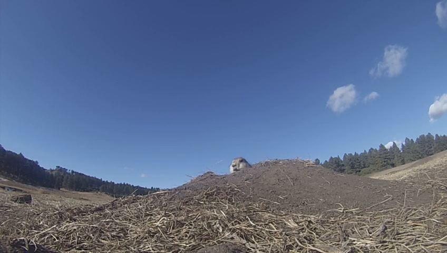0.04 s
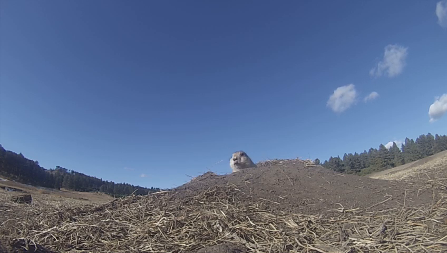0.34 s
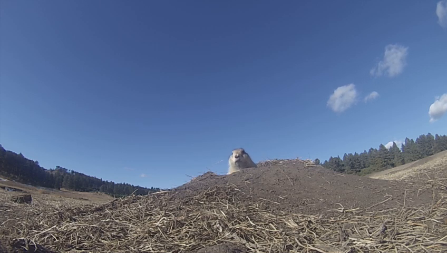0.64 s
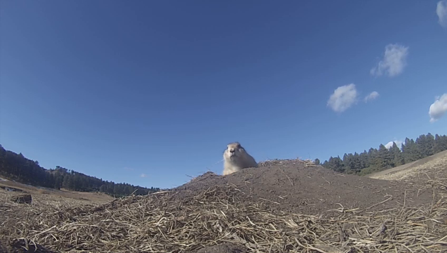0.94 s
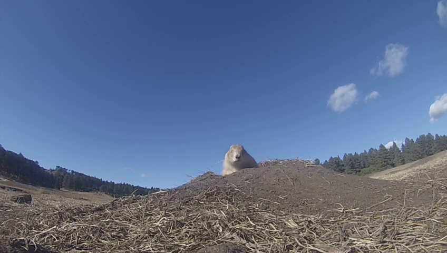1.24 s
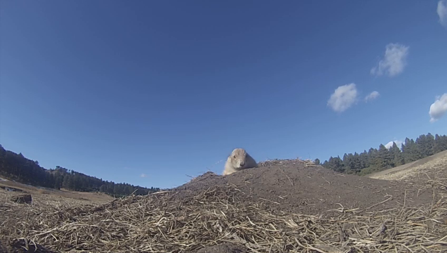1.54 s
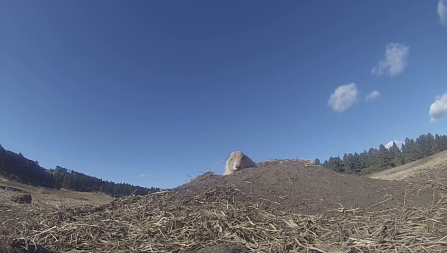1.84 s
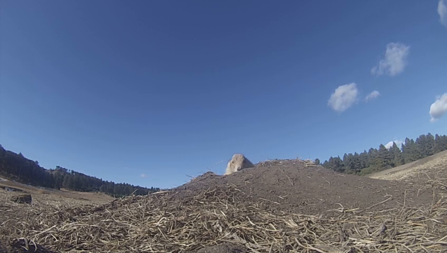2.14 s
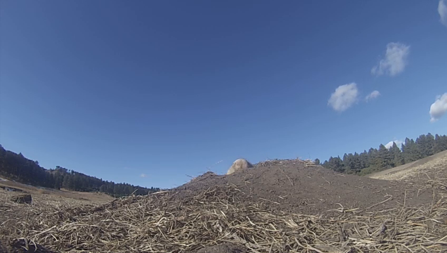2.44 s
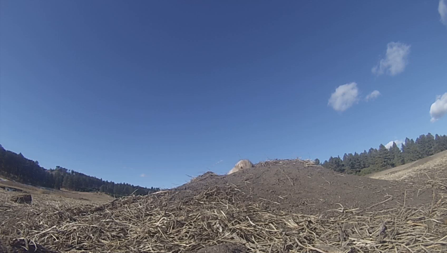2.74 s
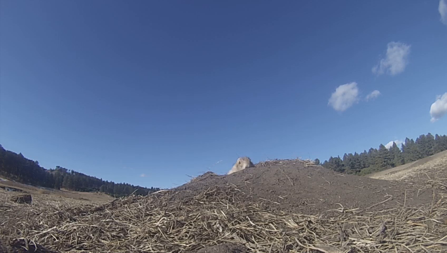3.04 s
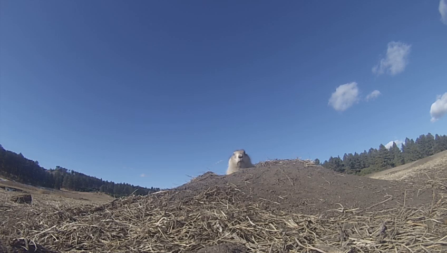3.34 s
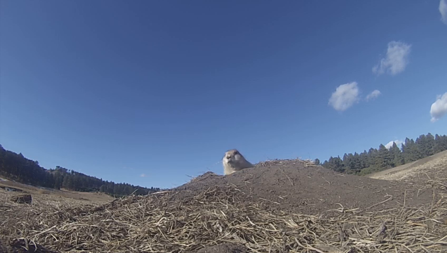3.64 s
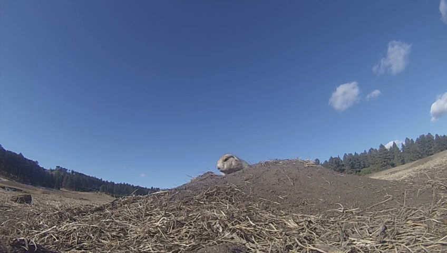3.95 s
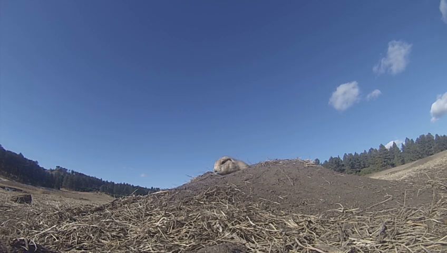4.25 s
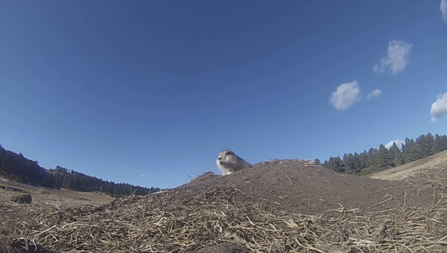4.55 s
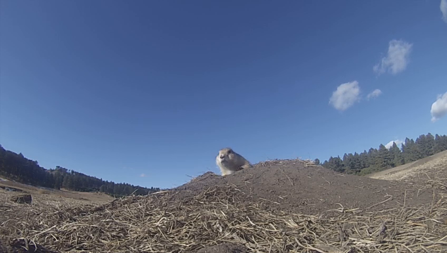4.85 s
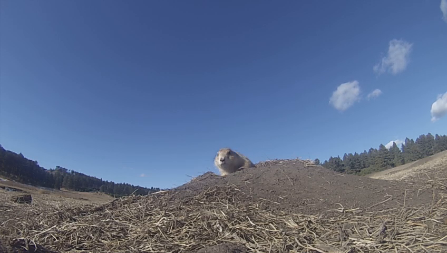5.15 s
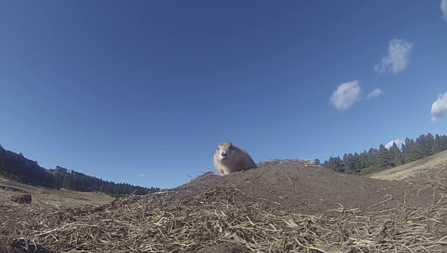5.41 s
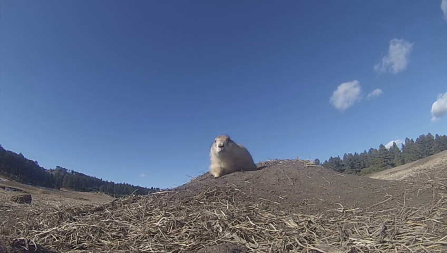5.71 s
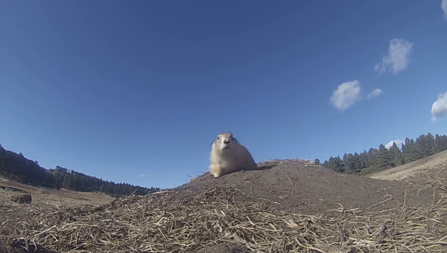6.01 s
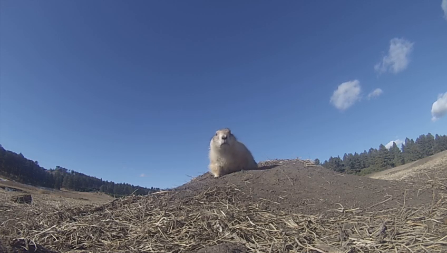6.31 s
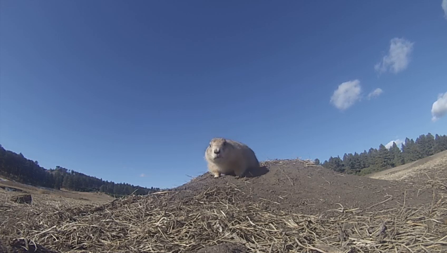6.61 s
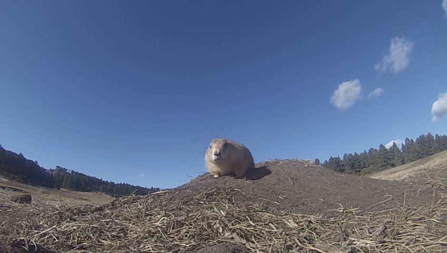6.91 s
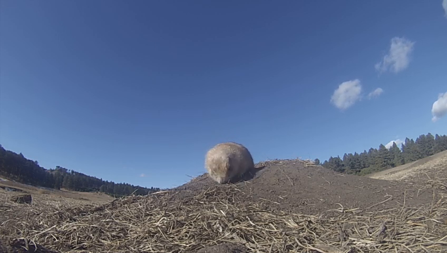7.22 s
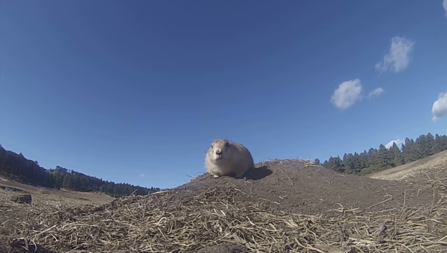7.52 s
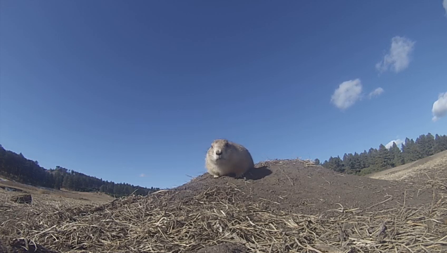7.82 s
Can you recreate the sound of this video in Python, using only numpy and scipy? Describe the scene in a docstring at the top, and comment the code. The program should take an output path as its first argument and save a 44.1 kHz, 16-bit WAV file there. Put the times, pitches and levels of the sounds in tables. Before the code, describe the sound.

Gusty wind buffets a microphone on open ground, over a soft airy roar, faint straw crackle and one very faint distant call.

```python
"""An open, dry valley, where gusts buffet a microphone lying on the ground.
Eddies rumble and thump at its port and grow finer as the wind rises; behind them sit the soft roar
of distant air and a thin hiss. Dry straw brushes and ticks in the gusts and under a small rodent's
feet. A few thin chirps and one very faint, far call come through."""
import sys
import numpy as np
from scipy import signal
from scipy.fft import rfft, irfft, next_fast_len
from scipy.io import wavfile

SR = 44100
rng = np.random.default_rng(int(sys.argv[2]) if len(sys.argv) > 2 else 0)


def generate_wav(signal):
    """Clip the signal to [-1, 1] and save it as 16-bit WAV at the path in sys.argv[1]."""
    frames = np.transpose(np.atleast_2d(signal))
    scaled = np.clip(frames, -1, 1) * 32767
    pcm = np.round(scaled).astype(np.int16)
    wavfile.write(sys.argv[1], SR, pcm)


N = 351477
T = np.arange(N) / SR


def gain_of(db):
    """Decibels to amplitude."""
    return 10 ** (np.asarray(db) / 20)


def unit_rms(x):
    """Scales a signal to rms 1."""
    return x / np.sqrt(np.mean(x ** 2) + 1e-30)


def eq_at(points, hz):
    """Reads an EQ curve on a log-frequency axis."""
    f, value = np.transpose(points)
    return np.interp(np.log(hz + 1), np.log(f + 1), value)


def noise(shape, size=N):
    """Noise of rms 1 whose amplitude spectrum is shape(Hz)."""
    padded = next_fast_len(size, True)
    spectrum = rfft(rng.standard_normal(padded)) * shape(np.fft.rfftfreq(padded, 1 / SR))
    return unit_rms(irfft(spectrum, padded)[:size])


def flutter(rate_hz):
    """A random wobble of rms 1, up to about the given rate."""
    return noise(lambda f: f / (f + 2) / (1 + (f / rate_hz) ** 4))


def steadied(x, span_s):
    """Rides out the slow swells of a noise, leaving it at rms 1."""
    power = signal.oaconvolve(x ** 2, signal.windows.hann(int(span_s * SR)), "same")
    return unit_rms(x / np.sqrt(np.abs(power) + 1e-9))


def add_puff(mix, s, db, spread_s, shape):
    """Adds a puff of coloured noise under a Gaussian bell, centred on time s."""
    t = (np.arange(SR // 2) - SR // 4) / SR
    bell = np.exp(-.5 * (t / spread_s) ** 2)
    puff = noise(shape, size=len(t)) * bell
    puff *= gain_of(db) * np.linalg.norm(bell) / np.linalg.norm(puff)
    part = mix[round(s * SR) - SR // 4:][:len(t)]
    part += puff[:len(part)]


def wind(rise_s=0.012, fall_s=0.033, lull_s=0.014, unsteady_db=0.38, unsteady_hz=14):
    """Wind level in dB: gusts rise, hold and fall on top of a breeze, broken by brief lulls."""
    # The slow rise and fall under the gusts. Each row: time in seconds, level in dB.
    breeze = [(0.0, -36.5), (0.15, -38.5), (0.5, -41.5), (1.12, -37), (1.23, -43), (1.45, -36), (1.84, -39),
              (2.18, -34.5), (2.28, -36.5), (2.36, -33.5), (2.7, -32), (3.19, -29.5), (3.49, -35),
              (3.9, -32.5), (4.31, -42.5), (4.34, -44), (4.87, -48.5), (5.03, -38.5), (5.25, -44),
              (5.57, -27), (5.88, -33.5), (6.17, -37), (6.41, -35.5), (6.48, -43.5), (6.53, -34.5),
              (6.62, -39), (7.17, -33.5), (7.26, -49), (7.48, -37), (7.86, -46), (7.97, -34.5)]
    # Each row: start of a gust's hold in seconds, hold in seconds, level in dB.
    gusts = [(0.67, 0.02, -36), (0.868, 0.015, -34.5), (1.045, 0.089, -34.5), (1.286, 0.065, -35.5),
             (1.571, .19, -32), (1.903, 0.12, -31), (2.466, 0.21, -33), (2.793, 0.63, -33.5),
             (3.536, 0.16, -29.5), (3.831, 0.31, -33), (5.435, 0.35, -34), (5.5, 0.067, -32.5),
             (6.052, 0.036, -32), (6.233, 0.018, -28.5), (6.755, 0.035, -36), (6.865, 0.35, -40.5),
             (7.335, 0.056, -34), (7.595, 0.13, -38.5)]
    # Lulls between eddies, and a few slight lifts. Each row: time in seconds, level change in dB.
    lulls = [(0.02, -4), (1.83, 0), (2.0, -5), (2.29, -2.5), (2.42, -5), (2.57, 1.5), (2.69, -5.5),
             (2.77, -4), (2.885, -4.5), (3.06, 1), (3.3, 0), (3.5, -2), (4.36, -10), (5.62, -1), (5.87, -1),
             (6.13, 1), (6.205, 1.5), (6.61, -12), (6.83, -6), (7.54, -4)]
    power = gain_of(np.interp(T, *np.transpose(breeze))) ** 2
    for start, hold_s, db in gusts:
        rising = np.minimum(T - start, 0) / rise_s
        falling = np.maximum(T - start - hold_s, 0) / fall_s
        power += (gain_of(db) * np.exp(-rising ** 2 - falling ** 2)) ** 2
    lull_db = sum(db * np.exp(-.5 * ((T - s) / lull_s) ** 2) for s, db in lulls)
    return 10 * np.log10(power) + lull_db + unsteady_db * flutter(unsteady_hz)


def rumble(wind_db, level_db=-33.0, deep_shake_db=1.5, fine_shake_db=2.5, eddy_hz=32):
    """Turbulence at the port, octave by octave; passing eddies shake all octaves together."""
    # The tone in a moderate wind. Each row: frequency in Hz, relative level in dB.
    tone = [(10, -9.5), (22, 2.4), (45, 2.2), (75, -2.5), (115, -9), (185, -15), (260, -24), (400, -32.5),
            (700, -37.5), (1400, -53), (3000, -69)]
    # Small eddies outgrow large ones, bar the top band. Each row: band in Hz, dB per dB of wind.
    growth = [(60, 1.38), (120, 1.42), (240, 1.47), (480, 1.86), (960, 0.94)]
    padded = next_fast_len(N, True)
    hz = np.fft.rfftfreq(padded, 1 / SR)
    turbulence = noise(lambda f: gain_of(eq_at(tone, f)) * f / (f + 3) / (1 + (f / 4000) ** 2), padded)
    spectrum = rfft(turbulence)
    eddies = steadied(flutter(eddy_hz), span_s=0.13)
    centres_hz = np.geomspace(60, 960, 5)
    out = np.zeros(N)
    for k, centre in enumerate(centres_hz):
        crossover = np.interp(np.log(hz + 1), np.log(centres_hz), np.arange(len(centres_hz)) == k)
        band = irfft(spectrum * crossover, padded)[:N]
        shake_db = np.interp(k, [0, 2], [deep_shake_db, fine_shake_db])
        drive_db = eq_at(growth, centre) * wind_db + shake_db * eddies
        out += band.std() * steadied(band, span_s=0.15) * gain_of(drive_db)
    return gain_of(level_db) * out


def roar(trim_db=1.83, waver_db=0.7, waver_hz=70, deep_hz=470):
    """Far moving air: a soft, low wash that slowly swells and deepens."""
    # The tone of the wash. Each row: frequency in Hz, relative level in dB.
    tone = [(20, -18), (130, -4), (280, 1), (410, -1.5), (580, -2), (720, -4.5), (870, -10), (1080, -18.5),
            (1300, -21), (1700, -26.5), (4000, -40)]
    # Its swell. Each row: time in seconds, level before the trim in dB, low-shelf gain in dB.
    swell = [(0, -52, -5), (1.5, -52.5, -1.5), (3.2, -50.5, -0.5), (4.5, -51.5, 0), (5.9, -50.5, -0.5),
             (7.97, -52, -0.5)]
    s, swell_db, shelf_db = np.transpose(swell)
    wash = noise(lambda f: gain_of(eq_at(tone, f)) / (1 + (f / 6000) ** 2))
    lows = signal.sosfiltfilt(signal.butter(2, deep_hz, fs=SR, output="sos"), wash)
    wash += lows * (gain_of(np.interp(T, s, shelf_db)) - 1)
    return wash * gain_of(np.interp(T, s, swell_db) + trim_db + waver_db * flutter(waver_hz))


def hiss(wind_db, floor_db=-67.0, gust_db=-79, waver_db=0.37, waver_hz=24):
    """A smooth, thin bed that the strongest gusts lift a little."""
    # The tone of the bed. Each row: frequency in Hz, relative level in dB.
    tone = [(300, 6), (1800, 1), (2300, 1), (2700, -1), (3500, -1.5), (5400, -4.5), (6100, -5),
            (7300, -7.5), (10000, -10.5), (12500, -13.5), (13600, -10.5), (15000, -15)]
    level = np.hypot(gain_of(floor_db), gain_of(gust_db + wind_db))
    return noise(lambda f: gain_of(eq_at(tone, f))) * level * gain_of(waver_db * flutter(waver_hz))


def straw_brush(wind_db, level_db=-76, growth=0.28, clump_db=2.5, clump_hz=90):
    """Dry stalks brush together in soft, short clumps, louder in the gusts."""
    centre_hz, half_width_hz = 2400, 1100
    brush = noise(lambda f: f / (f + 800) / (1 + ((f - centre_hz) / half_width_hz) ** 2))
    clumps = np.minimum(flutter(clump_hz), 2.5)
    return brush * gain_of(level_db + growth * wind_db + clump_db * clumps)


def stalk_ring(hz, tilt_db):
    """Amplitude spectrum of a snapping stalk, tilted by tilt_db per octave above 2 kHz."""
    # A dry stalk's resonances. Each row: centre in Hz, width in Hz, relative level in dB.
    modes = [(1490, 560, -4), (2670, 600, -2), (3730, 670, -10), (6080, 500, -11.5), (8600, 900, -15),
             (11400, 700, -19)]
    peaks = sum(gain_of(db) / (1 + ((hz - centre) / (width / 2)) ** 2) for centre, width, db in modes)
    octaves_up = np.log2(np.maximum(hz, 2000) / 2000)
    return peaks * hz / (hz + 800) * gain_of(tilt_db * octaves_up)


def straw_crackle(level_db=-79.0, per_s=42, spread_s=0.00093):
    """Single stalks give tiny snaps at random, all with the same ring."""
    snaps = (rng.random(N) < per_s / SR) * rng.uniform(0.29, 1, N)
    envelope = signal.oaconvolve(snaps, signal.windows.gaussian(1001, spread_s * SR), "same")
    ring = noise(lambda f: stalk_ring(f, tilt_db=-1.0))
    return gain_of(level_db) * unit_rms(ring * envelope)


def buffets(trim_db=-5.0, steepness=6.76):
    """The hardest eddies hit the port as dull thumps; a larger one is deeper and slower to pass."""
    # Each row: time of a thump in seconds, level before the trim in dB, upper edge in Hz.
    thumps = [(0.157, -39, 70), (0.353, -28.5, 37.8), (1.098, -33, 122), (1.59, -26, 62),
              (1.607, -23.5, 193), (1.653, -32, 218), (1.707, -34, 220), (1.765, -29.5, 235),
              (1.925, -23, 71), (1.95, -35, 205), (2.216, -29.5, 110), (2.51, -20, 89), (2.625, -34, 220),
              (2.82, -21, 69), (2.852, -29, 70), (2.927, -28.5, 302), (2.987, -21, 138), (3.11, -24, 210),
              (3.139, -15.5, 109), (3.199, -20, 95), (3.213, -30.5, 240), (3.245, -20.5, 85),
              (3.27, -27.5, 215), (3.33, -26, 200), (3.377, -26, 220), (3.405, -26.5, 134),
              (3.583, -29, 89.5), (3.658, -19, 96), (3.67, -26, 220), (3.707, -26.5, 210), (3.98, -23, 97),
              (4.02, -24.5, 120), (4.09, -24, 152), (4.149, -33.5, 80), (4.29, -37, 70), (5.451, -22.5, 94),
              (5.51, -23, 199), (5.557, -24.5, 246), (5.586, -16.5, 100), (5.66, -19.5, 70),
              (5.690, -24, 176), (5.768, -26.5, 120), (6.038, -29, 80), (6.082, -19.5, 170),
              (6.167, -25, 100), (6.245, -30, 186), (6.267, -25, 94), (6.869, -28, 70), (7.135, -30, 40),
              (7.179, -31, 228), (7.338, -23.5, 48), (7.383, -22.5, 64)]
    out = np.zeros(N)
    for s, db, edge_hz in thumps:
        add_puff(out, s, db + trim_db, spread_s=1 / edge_hz,
                 shape=lambda f: f / (f + 50) / np.sqrt(1 + (f / edge_hz) ** steepness))
    return out


def straw_ticks():
    """Stalks tick and scuff in the gusts and under a small rodent's feet."""
    # Each row: time in seconds, level in dB, spread in seconds, treble tilt in dB per octave.
    ticks = [(0.948, -67, 0.001, 1), (1.449, -63, 0.002, -2), (1.471, -66, 0.001, 1),
             (1.843, -66, 0.002, -2), (2.043, -59, 0.002, -7), (2.45, -63, 0.002, -2),
             (2.97, -64, 0.0014, 4), (3.174, -58, 0.0015, -1), (3.583, -61, 0.002, -6),
             (4.197, -61, 0.001, -1), (4.606, -66, 0.002, -2), (4.811, -62, 0.001, -2),
             (4.95, -61, 0.001, 0), (5.016, -60, 0.001, -3), (5.223, -61, 0.001, -6),
             (5.444, -61.5, 0.003, 0), (5.586, -66, 0.003, -6), (5.631, -66, 0.005, -3),
             (5.772, -69, 0.0055, -3), (5.845, -67, 0.012, -3), (5.941, -65, 0.007, -2),
             (6.246, -62, 0.002, -5), (6.299, -64, 0.005, -1), (6.452, -64, 0.0015, 2),
             (6.86, -66, 0.002, 1), (6.952, -67, 0.003, 2), (7.575, -63, 0.002, -5)]
    out = np.zeros(N)
    for s, db, spread_s, tilt_db in ticks:
        add_puff(out, s, db, spread_s, lambda f: stalk_ring(f, tilt_db))
    return out


def chirps(attack_s=0.004, decay_s=0.005, detune=0.004):
    """Thin, very short chirps that start sharply and ring off, each at a slightly different pitch."""
    # Each row: start of a chirp in seconds, level in dB.
    cues = [(1.702, -69), (2.588, -72), (3.326, -60.5), (3.34, -65.5), (3.368, -65), (3.415, -70),
            (6.282, -66)]
    # A chirp's partials. Each row: pitch in Hz, offset from the chirp's level in dB.
    partials = [(4440, 0.5), (2830, -2)]
    out, t = np.zeros(N), np.arange(SR // 10) / SR
    envelope = np.minimum(t / attack_s, 1) * np.exp(-np.maximum(t - attack_s, 0) / decay_s)
    for s, db in cues:
        for hz, partial_db in partials:
            pitch_hz = hz * (1 + detune * rng.uniform(-1, 1))
            tone = np.sqrt(2) * np.sin(2 * np.pi * pitch_hz * t)
            out[round(s * SR):][:len(t)] += gain_of(db + partial_db) * envelope * tone
    return out


def far_call():
    """A lower, longer note, blurred by distance into a narrow band of noise."""
    # Each row: time in seconds, level in dB, spread in seconds, pitch in Hz, half-width in Hz.
    calls = [(3.62, -62, 0.044, 1320, 240)]
    out = np.zeros(N)
    for s, db, spread_s, hz, half_width_hz in calls:
        add_puff(out, s, db, spread_s, lambda f: 1 / (1 + ((f - hz) / half_width_hz) ** 4))
    return out


def scene(moderate_wind_db=-32):
    """The mono mix: one wind drives the rumble, the hiss and the brushing straw."""
    wind_db = wind() - moderate_wind_db
    air = rumble(wind_db) + buffets() + roar() + hiss(wind_db)
    straw = straw_brush(wind_db) + straw_ticks() + straw_crackle()
    return (air + straw + chirps() + far_call())[None]


def record(dry, cutoff_hz=15250):
    """The recorder's electronics add a faint whine and cut off the very top."""
    # The tones of the whine. Each row: frequency in Hz, level in dB.
    tones = [(3000, -90), (4000, -92.5), (6000, -98), (14566, -93.5), (14626, -98)]
    whine = sum(np.sqrt(2) * gain_of(db) * np.sin(2 * np.pi * (hz * T + rng.random()))
                for hz, db in tones)
    edge_fades = signal.windows.tukey(N, .0005)
    lowpass = signal.firwin(511, cutoff_hz, window=("kaiser", 9), fs=SR)
    return signal.oaconvolve((dry + whine) * edge_fades, lowpass[None], "same")


dry = scene()
out = record(dry)
generate_wav(out)
```